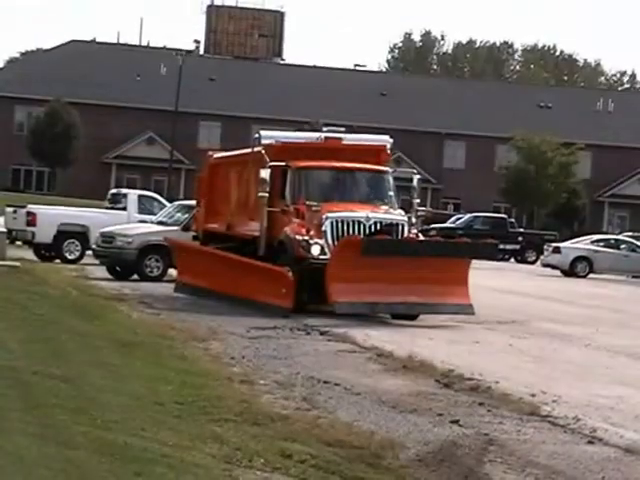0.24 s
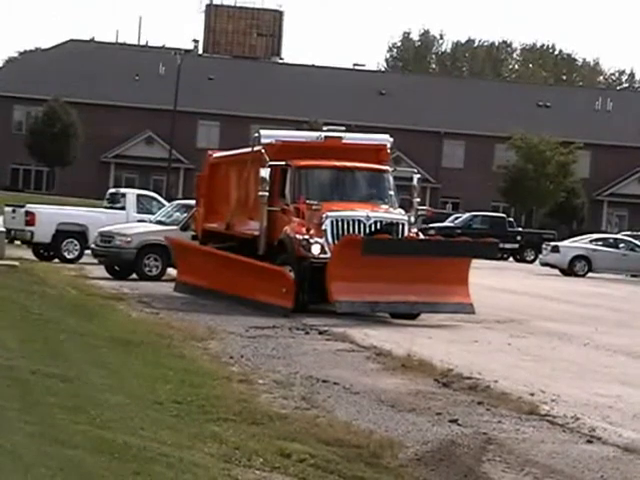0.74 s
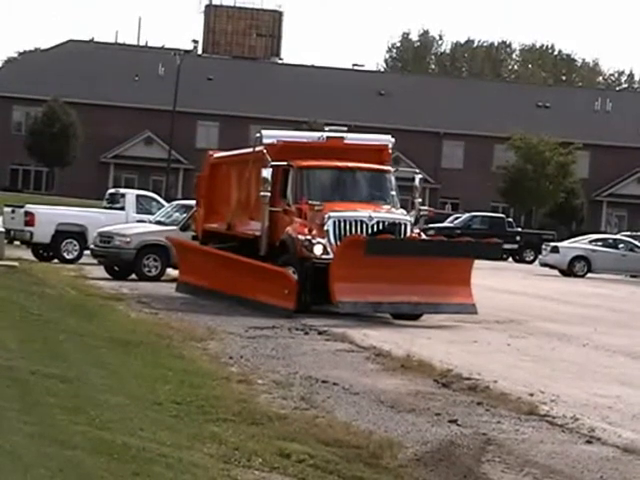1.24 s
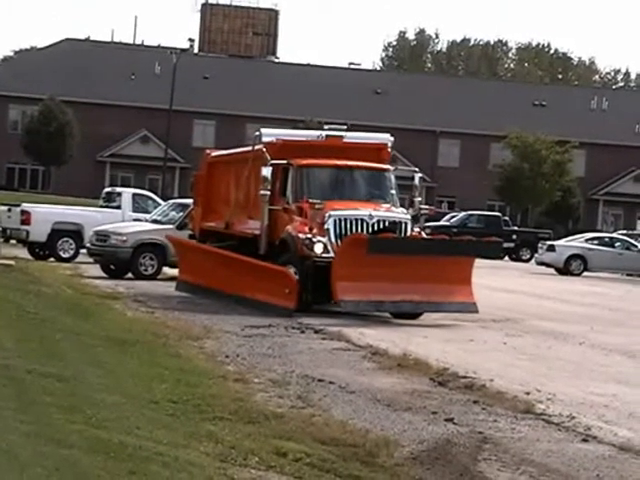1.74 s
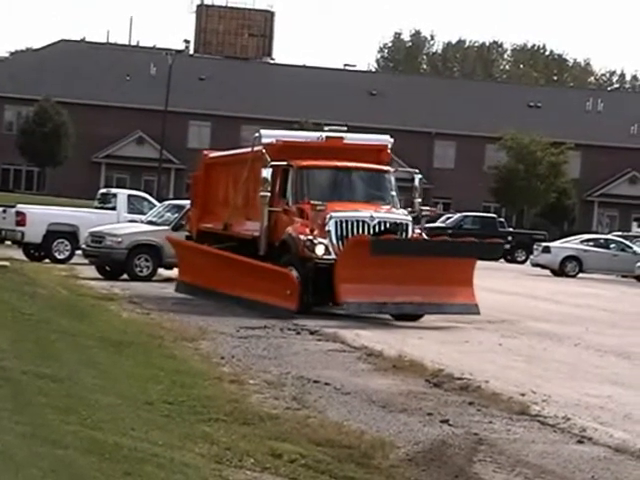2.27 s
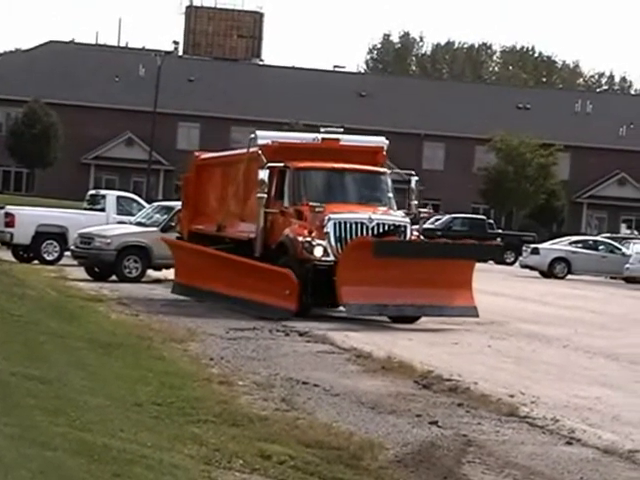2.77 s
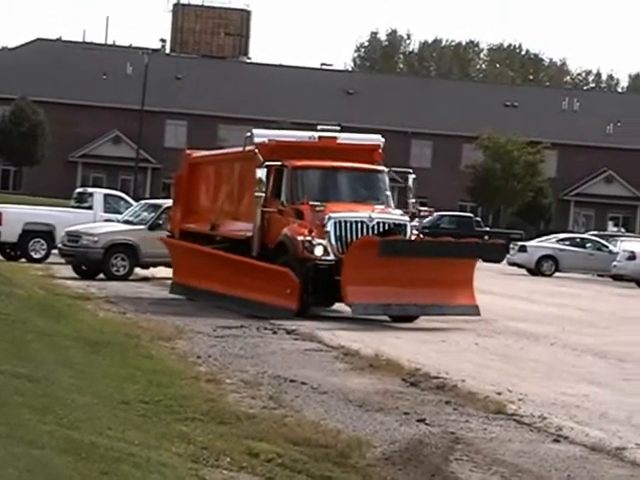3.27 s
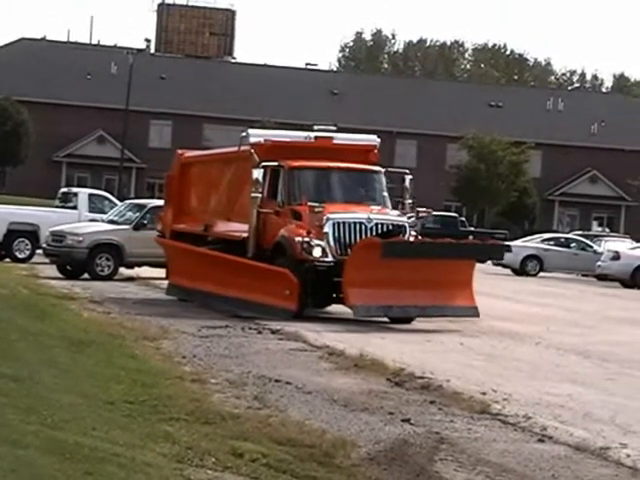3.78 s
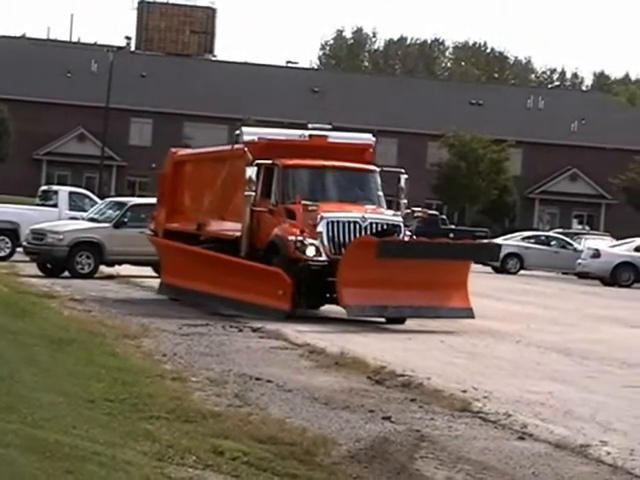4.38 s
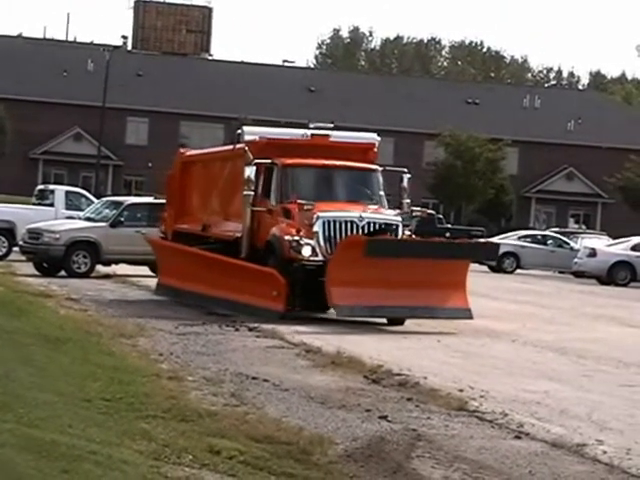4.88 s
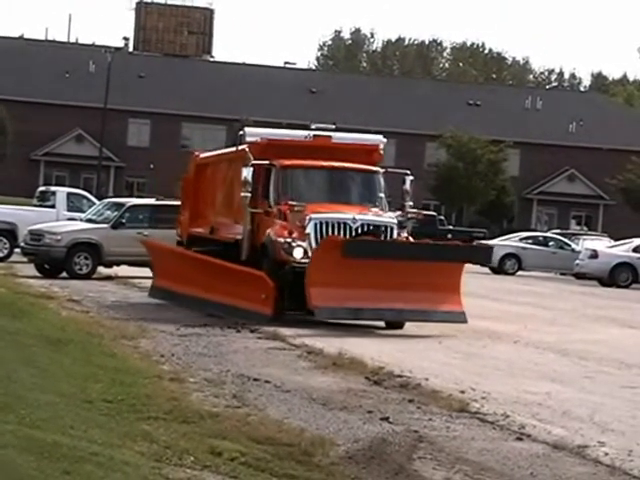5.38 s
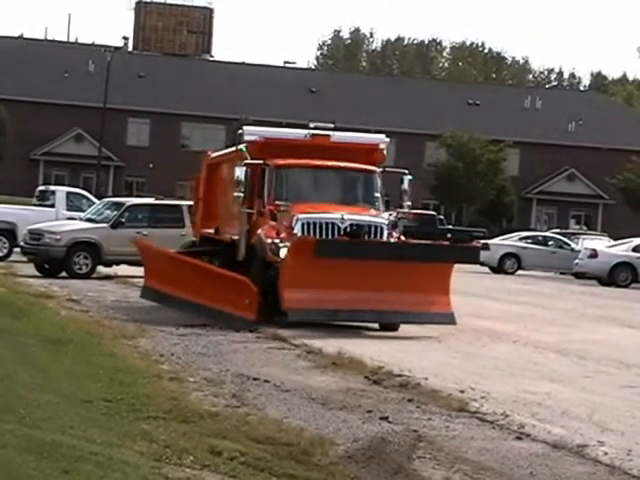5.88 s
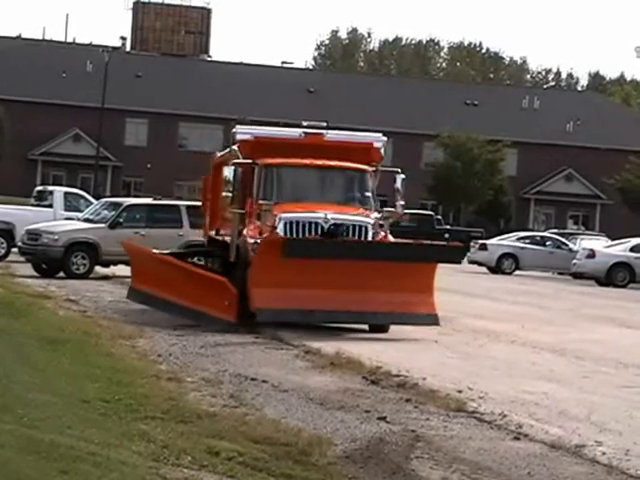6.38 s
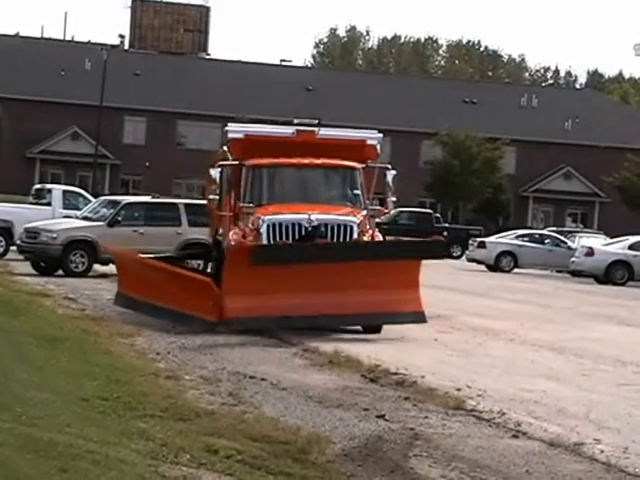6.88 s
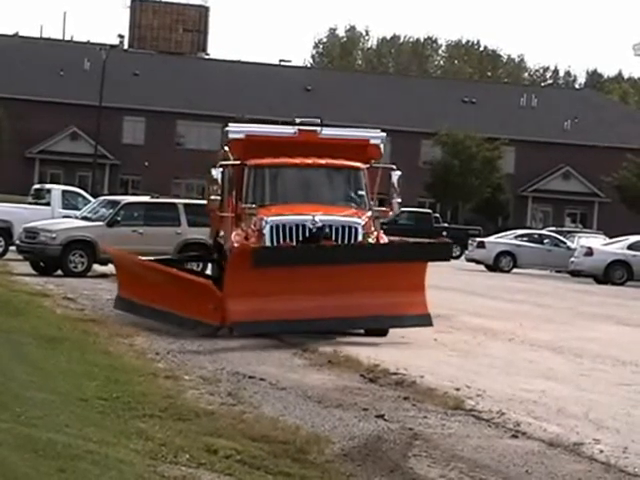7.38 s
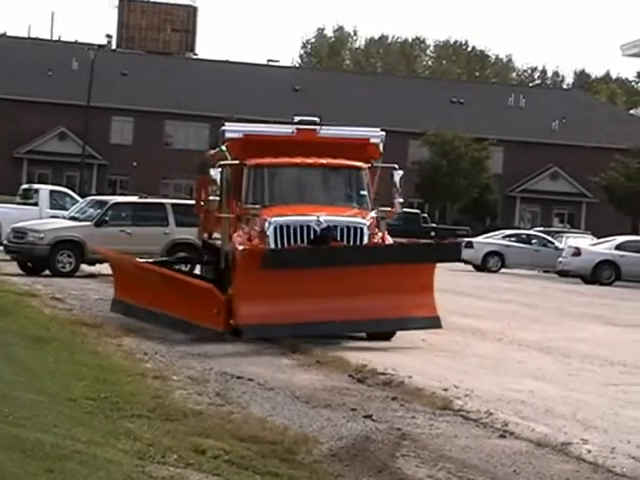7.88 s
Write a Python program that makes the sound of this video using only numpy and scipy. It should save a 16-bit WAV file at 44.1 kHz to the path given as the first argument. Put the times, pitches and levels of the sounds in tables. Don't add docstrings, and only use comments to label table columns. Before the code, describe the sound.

A distant diesel truck idles and rolls slowly over grit, its hydraulic pump humming unsteadily while gusts rumble across the stereo microphone. Occasional stones crunch. After a small scrape or two, the plough edge drops and grinds across rough ground in irregular bursts, with bright metallic ringing, a brief squeak, low frame booms and sprays of grit. The scraping continues until the end.

```python
import sys
import numpy as np
from scipy import signal
from scipy.fft import rfft, irfft, next_fast_len
from scipy.io import wavfile
from scipy.ndimage import uniform_filter1d

SR = 44100
rng = np.random.default_rng(int(sys.argv[2]) if len(sys.argv) > 2 else 0)


def gain_from_decibels(decibels):
    exponent = np.asarray(decibels, float) / 20
    return 10 ** exponent


def file_out(sig):
    cols = np.atleast_2d(sig).T
    lim = np.clip(cols, -1, 1)
    pcm = np.round(lim * 32767).astype(np.int16)
    wavfile.write(sys.argv[1], SR, pcm)


N = 358533
M = next_fast_len(N + 16384)
T = np.arange(N) / SR
F = np.maximum(np.fft.rfftfreq(M, 1 / SR), 1)


def along(points):
    hz, value = np.transpose(points)
    return np.interp(np.log(F), np.log(hz), value)


def curves(table):
    seconds, *columns = np.transpose(table)
    return [np.interp(T, seconds, column) for column in columns]


def unit(x):
    return x / np.sqrt(np.mean(x ** 2))


def even(x, over_s):
    return x / np.sqrt(uniform_filter1d(x ** 2, size=int(over_s * SR)) + 1e-12)


def walk(rate):
    hold = int(SR / rate)
    steps = np.repeat(rng.standard_normal(N // hold + 1), hold)
    return unit(uniform_filter1d(steps, hold)[:N])


def bump(centre_s, half_s):
    return np.exp(-((T - centre_s) / half_s) ** 2)


def sine(hz):
    return np.sin(2 * np.pi * np.cumsum(hz) / SR)


def shape(x, gain):
    return irfft(rfft(x, M) * gain, M)[..., :N]


def hiss(points):
    return unit(shape(rng.standard_normal(N), gain_from_decibels(along(points))))


def ring(x, hz, width_hz):
    return signal.lfilter(*signal.iirpeak(hz, hz / width_hz, SR), x)


def grit(scatter_db, rate):
    hit = rng.random(N) < rate / SR
    size_db = scatter_db * np.minimum(rng.exponential(size=N), 3)
    return unit(hit * rng.standard_normal(N) * gain_from_decibels(size_db))


def burst(s, rise_s, fall_s):
    span = slice(int(s * SR), min(int((s + .4) * SR), N))
    t = T[span] - T[span][0]
    return (1 - np.exp(-t / rise_s)) * np.exp(-t / fall_s), span


def add(out, x, db, envelope, span):
    out[span] += gain_from_decibels(db) * envelope * x[span]


ZONES_HZ = (200, 1200, 5000)


def zoned(x, zones_db, flicker_db, rate):
    spectrum = rfft(x, M)
    power = np.abs(spectrum) ** 2 * 2 / (M * N)
    edges = [(100, 330), (500, 2500), (3000, 8000)]
    own_db = [10 * np.log10(np.sum(power[(F > lo) & (F < hi)])) for lo, hi in edges]
    out = 0
    for hz in 30 * 2 ** np.arange(0, 9, .5):
        window = np.cos(np.pi * np.clip(np.log2(F / hz), -.5, .5)) ** 2
        shares = [np.interp(np.log(hz), np.log(ZONES_HZ), row) for row in np.eye(3)]
        db = sum(share * (zone - own) for share, zone, own in zip(shares, zones_db, own_db))
        out = out + gain_from_decibels(db + flicker_db * walk(rate)) * irfft(spectrum * window, M)[:N]
    return out


# frequency in Hz, level in dB per Hz.
ROAR = [(15, -67), (25, -24), (70, -3.5), (117, -2.5), (191, 0.5), (304, -8), (343, -11), (461, -13),
        (589, -9), (770, -11), (829, -11), (2380, -13.5), (4280, -19.5), (6030, -23), (8700, -33.5),
        (11300, -69), (19100, -120)]
# time in seconds, roll level in dB.
ROLL = [(0, -29), (.4, -28), (.8, -26.5), (1.3, -27.5), (1.6, -28.5), (2, -28), (2.5, -25), (3.05, -24),
        (3.35, -25), (4.1, -24.5), (4.55, -26), (5, -26)]


def truck(pump_hz):
    cycle = np.cumsum(pump_hz / 10 / SR) % 1
    clatter = 1 + 0.29 * np.exp(-cycle / 0.16)
    source = rng.standard_normal(N) * clatter + 0.5 * grit(4.5, 4000)
    near_s = np.minimum(T, 3.5)
    load_db = 3.5 * bump(4.82, 0.16)
    rumble_db = -35.5 + 1.45 * near_s + load_db + 0.68 * walk(12)
    roll_db = curves(ROLL)[0]
    hiss_db = -13 + roll_db + 0.14 * near_s
    return zoned(shape(source, gain_from_decibels(along(ROAR))), (rumble_db, roll_db, hiss_db), 0.9, 9)


# frequency in Hz, level in dB per Hz.
TREAD = [(900, -33), (1400, -11), (2100, -5), (2650, -1), (2900, -9), (3800, -6), (4200, -40)]


def tread():
    slap_db = -38 + 4.4 * (curves(ROLL)[0] + 25.5)
    return gain_from_decibels(slap_db + 1.3 * walk(8)) * hiss(TREAD)


# time in seconds, pitch in Hz, hum level in dB.
PUMP = [(0, 356.7, -33.5), (.28, 349.8, -31), (.6, 351.6, -36), (.85, 350, -34), (1, 350.5, -36),
        (1.25, 352, -37), (1.48, 349, -31), (1.58, 347.4, -39), (1.75, 348, -41), (1.9, 352.4, -40),
        (2.2, 350.6, -44.5), (2.42, 342.6, -38), (2.6, 343, -44.5), (3.3, 340, -43.5), (4.6, 336.3, -48.5),
        (5.3, 336, -39.5), (5.9, 339, -35), (6.2, 340, -39)]


def pump(hz, hum_db):
    octave_db = hum_db - 1 - 6.5 * np.maximum(T - 0.54, 0)
    phase = 2 * np.pi * np.cumsum(hz * (1 + 0.0089 * walk(25.01))) / SR
    beat = 1 + 0.47 * np.cos(2 * np.pi * 8.2 * (T - 0.28))
    hum = beat * gain_from_decibels(hum_db + 2.5 * walk(20)) * np.sin(phase)
    octave = gain_from_decibels(octave_db - 3 + 3.5 * walk(28)) * np.sin(2 * phase)
    return np.sqrt(2) * (hum + octave) * np.clip((6.3 - T) / 0.65, 0, 1)


# time in seconds, drag level in dB.
DRAG = [(4.95, -24.5), (5.1, -20.5), (5.26, -22), (5.35, -16.5), (5.43, -19), (5.55, -19), (5.7, -23),
        (6.05, -20.5), (6.35, -17), (6.6, -21), (7.1, -19), (7.3, -20.5), (7.45, -17.5), (7.63, -17.5),
        (7.8, -18.5), (8.13, -19.5)]
# landing in seconds, easing in seconds, depth in dB.
HOPS = [(5.04, 0.079, 18), (5.217, 0.087, 10), (5.48, 0.088, 0.5), (5.608, 0.13, 7), (5.805, 0.13, 7),
        (5.902, 0.047, 19), (6.005, 0.074, 23), (6.145, 0.033, 2.5), (6.319, 0.17, 1.5), (6.743, 0.016, 11),
        (6.88, 0.035, 0.5), (7.171, 0.13, 2), (7.89, 0.069, 3)]
# start in seconds, boom level in dB.
HEAVES = [(5.14, -22), (5.301, -19), (5.469, -16.5), (5.61, -20), (5.68, -17.5), (5.81, -16), (5.9, -14),
          (6.03, -24), (6.15, -26), (6.319, -20), (6.71, -20), (6.92, -32), (7.11, -44), (7.17, -17.5),
          (7.23, -15), (7.279, -17), (7.33, -25), (7.53, -21), (7.56, -27), (7.7, -32), (7.8, -33),
          (7.9, -34), (7.97, -32), (8.05, -36)]


def pressure():
    eased_db = sum(db * np.clip(1 - (s - T) / lead_s, 0, 1) * (T < s) for s, lead_s, db in HOPS)
    drag_db = curves(DRAG)[0]
    frame = gain_from_decibels(drag_db - eased_db - 14.5)
    for s, db in HEAVES:
        add(frame, np.ones(N), db + 1.0, *burst(s, 0.0084, 0.039))
    grit_db = drag_db - 17 - 2.9 * eased_db + 3 * (T - DRAG[0][0])
    grit_db = grit_db - bump(4.5, 0.033)
    return 20 * np.log10(frame), drag_db - eased_db, grit_db


# frequency in Hz, width in Hz, level in dB.
BLADE = [(169, 35, -16), (230, 30, -13), (276, 41, -5.5), (502, 61, -7.5), (577, 21, -5.5), (824, 31, -4.5),
         (1260, 8.4, -0.5), (1440, 9.9, -16), (1618, 7.2, 3), (1704, 42, -15), (1742, 9.7, 1),
         (2046, 19, -10.5), (2135, 18, 0), (2470, 14.5, 5.5), (2610, 9.9, -0.5), (2869, 18, 3.5),
         (3050, 116, -3), (3310, 16, 6), (3400, 13, -8), (3587, 29, -5.5), (4390, 23, -6.5),
         (4550, 46, -7.5), (1215, 13, -5), (5000, 13, -23), (5200, 20, -24), (6200, 30, -39)]
# frequency in Hz, level in dB per Hz.
RASP = [(35, -38), (60, -34), (182, 9.5), (404, -16.5), (577, 1.5), (955, -5.5), (1230, -1), (1910, -6),
        (2120, 1), (3290, -4), (4230, -9.5), (8450, -61), (9000, -50), (11700, -79), (19800, -120)]


def steel(x, wash_db):
    modes = sum(gain_from_decibels(db + 2.2 * walk(12)) * ring(x, hz, width_hz) for hz, width_hz, db in BLADE)
    return modes + gain_from_decibels(wash_db) * shape(x, gain_from_decibels(along(RASP)))


def blade():
    wander = gain_from_decibels(.8 * walk(25))
    chatter = wander * (rng.standard_normal(N) + 0.5 * grit(1.85, 4000))
    touch = np.clip((T - 4.9) / .15, 0, 1)
    return touch * gain_from_decibels(-2.5) * zoned(steel(chatter, -8.0), pressure(), 1.0, 13)


# frequency in Hz, gain in dB.
SCRAPE = [(200, -2.5), (600, -2.5), (900, -3.5), (1500, 1.5), (2500, 0.5), (3400, 0), (5000, -2)]
# start in seconds, peak in dB, ringing mode in Hz, share of ringing in dB.
CATCHES = [(4.255, -28, 2390, 8), (4.73, -11, 2480, 0), (5.04, -20.5, 4880, 14.5), (5.084, -20, 1440, 15),
           (5.214, -4, 2392, -3), (5.27, -15.5, 3300, -1), (5.311, -9, 2760, 5.5), (5.324, -13, 4170, -3),
           (5.346, -12, 5170, -4.5), (5.37, -19, 2850, 3), (5.41, -18, 5260, -12),
           (5.484, -4.5, 2400, -4.5), (5.606, -8, 3100, -6), (5.64, -18.5, 271, 7), (5.809, -16, 1320, 8),
           (5.89, -17, 4560, 3), (6.008, -9.5, 2460, -3), (6.045, -14, 2090, 8.5), (6.15, -8, 2100, -1.5),
           (6.19, -15.5, 786, 12.5), (6.322, -2.5, 2090, -8), (6.405, -17, 2160, 9),
           (6.716, -5.5, 2850, 3.5), (6.785, -1, 2860, -3), (7.003, -6, 2920, 0.5),
           (7.056, -12.5, 3000, -11), (7.112, -12.5, 2680, 5.5), (7.174, -4, 1670, 3.5),
           (7.205, -6.5, 3310, -2), (7.285, -15, 610, 8.5), (7.3, -17, 940, 13), (7.353, -5.5, 1830, 6.5),
           (7.493, -13, 2630, -2), (7.508, -16, 790, 12.5), (7.551, -14.5, 3270, 10), (7.617, 0, 2460, 2),
           (7.633, -19, 2130, 5), (7.67, -21.5, 1170, 8), (7.729, -10, 1580, 2), (7.89, -7.5, 2560, -1),
           (7.954, -10.5, 2400, 9), (8.051, -12, 2630, -11.5)]


def catches():
    out, noise = np.zeros(N), rng.standard_normal((2, N))
    scrape = even(shape(steel(noise[0], 4.9), gain_from_decibels(along(SCRAPE))), 0.036)
    boom = even(ring(ring(noise[1], 205, 200), 194, 240), 0.037)
    spray = hiss([(2500, -47), (3500, 8.0), (5500, 13.5), (8500, -18), (10000, -47)])
    for s, db, hz, ring_db in CATCHES:
        spray_db = -20 + 0.15 * db - 21 * (s > 5.7)
        tone = even(ring(noise[1], hz, 160), .04) + .3 * np.sin(2 * np.pi * hz * T)
        add(out, scrape, db - 13.0, *burst(s, 0.0069, 0.035))
        add(out, tone, db - 18.5 + ring_db, *burst(s, 0.001, 0.024))
        add(out, boom, db - 21.0, *burst(s, 0.011, 0.03))
        add(out, spray, spray_db - 10.0, *burst(s, 0.0008, 0.027))
    return out


# start in seconds, pitch in Hz, level in dB.
THUDS = [(4.33, 190, -25), (4.64, 192, -23), (4.85, 169, -24), (5.315, 205, -17), (5.47, 200, -23),
         (5.62, 277, -18), (5.75, 139.7, -21), (5.89, 197, -21), (6.069, 154, -19), (7.176, 247, -15.5),
         (7.225, 190, -27.5), (7.275, 237, -15), (7.346, 175, -22), (7.55, 186, -16), (7.71, 160, -19.5)]


def thuds():
    out = np.zeros(N)
    for s, hz, db in THUDS:
        add(out, np.sin(2 * np.pi * hz * (T - s)), db + 3.0, *burst(s, 0.0051, 0.026))
    return out


SINGING_HZ = (577, 822)
# time in seconds, lower mode in dB, upper mode in dB.
SINGING = [(3.7, -45, -56), (4, -35.5, -50), (4.5, -49, -46), (5.08, -36.5, -33), (5.45, -32.5, -29.5),
           (5.68, -30.5, -38), (5.78, -40, -37), (5.9, -29, -29), (6.02, -34, -43), (6.18, -23.5, -33),
           (6.28, -36, -42), (6.36, -26, -33), (6.75, -34, -32.5), (7.08, -33, -38), (7.22, -34, -25),
           (7.4, -29, -38), (7.55, -27.5, -28.5), (8.13, -48, -42)]


def singing():
    out = 0
    for hz, db in zip(SINGING_HZ, curves(SINGING)):
        out = out + gain_from_decibels(db - 3.5 + 1.7 * walk(14)) * sine(hz * (1 + 0.00595 * walk(14)))
    return np.sqrt(2) * out * np.clip((T - 3.6) / .15, 0, 1)


# frequency in Hz, half width in Hz, level in dB.
CORNER = [(3720, 52, -13), (4260, 31, -21), (4880, 34, 20.5), (5360, 31, 19), (6150, 91, -10),
          (6800, 57, -30)]
# frequency in Hz, level in dB, fall in seconds.
SQUEAK = [(2080, -22.5, 0.029), (2160, -18.5, 0.027), (2225, -21, .015), (4250, -40, .01)]


def corner():
    rub = rng.standard_normal(N) * gain_from_decibels(2.3 * walk(20))
    modes = unit(sum(gain_from_decibels(db) * ring(rub, hz, 2 * half_hz) for hz, half_hz, db in CORNER))
    from_peak_s = T - 4.95
    skim_db = -45 - np.maximum(-40 * from_peak_s, 15 * from_peak_s)
    out = modes * gain_from_decibels(skim_db) * (T > 4.6) * (T < 5.9)
    for hz, db, fall_s in SQUEAK:
        tone = gain_from_decibels(1.5 * walk(62)) * sine(hz + 15 * walk(120))
        add(out, tone, db + 6, *burst(6.399, .003, fall_s))
    return out


# start in seconds, peak in dB.
STONES = [(0.4814, -24), (1.3294, -18.5), (2.299, -18), (2.7894, -20), (2.9764, -25), (3.2564, -12),
          (3.6994, -20.5), (3.899, -12.5), (4.4094, -22), (4.8224, -18)]
# start in seconds, level in dB.
SNAPS = [
    (5.2135, -21),
    (5.611, -29),
    (5.889, -30),
]


def stones():
    out = np.zeros(N)
    crunch = unit(ring(ring(ring(grit(1.6, 6900), 4200, 4300), 5400, 4300), 4500, 5000))
    snap = hiss([(1200, -30), (2400, 2.0), (7000, -2.0), (11000, -13.0)])
    for s, db in STONES:
        add(out, crunch, db - 18.0, *burst(s, 0.00053, 0.023))
    for s, db in SNAPS:
        add(out, snap, db, *burst(s, 0.0008, 0.0078))
    return out


# peak in seconds, buffet level in dB, half length in seconds.
GUSTS = [(0.2, -21, 0.18), (.43, -25.5, 0.14), (0.684, -26.5, 0.1), (1.047, -26, 0.24), (1.297, -23, 0.16),
         (1.58, -19.5, 0.1), (1.741, -26.5, 0.11), (2.017, -38, 0.073), (2.188, -29, 0.1),
         (2.4, -39, 0.081), (2.64, -33, 0.057), (2.853, -37, 0.085), (3.018, -42, .05), (3.3, -41, .09),
         (3.735, -30, 0.1), (3.948, -36, .1), (4.15, -43, 0.065), (4.402, -45, 0.14), (4.626, -44, .07),
         (4.83, -42, 0.065), (6.1, -43, 0.096), (6.9, -38, 0.12), (7.125, -34, 0.15), (7.4, -35, 0.14),
         (7.7, -38, .12), (7.901, -40, 0.076), (8.106, -33, 0.055)]
# frequency in Hz, level in dB per Hz.
BUFFET = [(18, -50), (30, -20), (83, -4), (140, 0), (339, -13), (590, -18), (700, -22.5), (910, -63),
          (1540, -120)]


def wind():
    push, common = hiss(BUFFET), hiss(BUFFET)
    gusts = gain_from_decibels(-69) + sum(gain_from_decibels(db) * bump(s, half_s) for s, db, half_s in GUSTS)
    gust_db = 20 * np.log10(gusts) + 0.99 * walk(28)
    upper = signal.sosfilt(signal.butter(2, 220, "high", fs=SR, output="sos"), push)
    push = push - upper * np.clip((-12 - gust_db) / 16, 0, .9)
    return gain_from_decibels(gust_db) * push, gain_from_decibels(gust_db) * (gain_from_decibels(-9) * common + .13 * push)


# frequency in Hz, diffuse share in dB.
SPREAD = [(100, -44), (400, -13), (900, -24), (2500, -29), (5000, -21), (7000, -27.5), (9000, -11.5)]
# frequency in Hz, quadrature share as a ratio.
LEAD = [(300, 0.005), (900, 0.19), (1800, 0.13), (2600, 0.042), (4500, 0.088), (7000, 0.014)]
# frequency in Hz, level in dB per Hz.
AIR = [(180, -35), (300, -9), (485, -16), (557, -26), (675, 2.5), (1940, 6.5), (5910, -10), (6880, -29),
       (8000, -31), (10400, -65), (17600, -120)]


def scene():
    hz, hum_db = curves(PUMP)
    front = truck(hz) + pump(hz, hum_db) + blade() + catches() + corner() + stones()
    smear = rng.standard_normal(16384) * np.exp(-np.arange(16384) / SR / 0.12)
    scatter = rfft(smear, M) / np.linalg.norm(smear) * gain_from_decibels(along(SPREAD))
    side = shape(front, scatter + 1j * along(LEAD))
    side = side + gain_from_decibels(-40 + 1.5 * walk(2)) * hiss(AIR)
    push, common = wind()
    front = front + singing() + tread() + thuds()
    lean = gain_from_decibels((0.67 - 0.1158 * T) / 2)
    return np.array([front * lean + common + side + push, front / lean + common - side - push])


def band_limit(x):
    return signal.sosfilt(signal.butter(12, 10960, fs=SR, output="sos"), x)


# frequency in Hz, gain in dB.
MIC = [(5600, 1), (6050, 1), (6350, -4.5), (6700, 2.5), (8600, 2.5), (9000, -5.5), (9600, -6), (10300, -8),
       (10600, -18), (11000, -19)]


def record(dry):
    bass_cut = signal.butter(2, 40, "high", fs=SR, output="sos")
    mix = signal.sosfilt(bass_cut, shape(dry, gain_from_decibels(along(MIC))))
    return band_limit(mix)


dry = scene()
out = record(dry)
file_out(out)
```